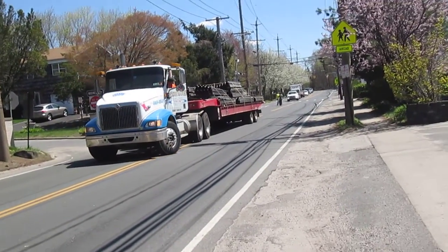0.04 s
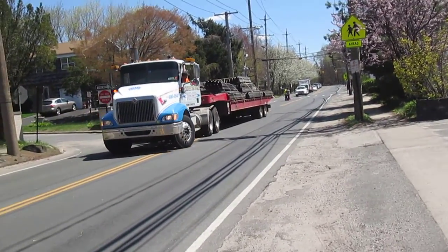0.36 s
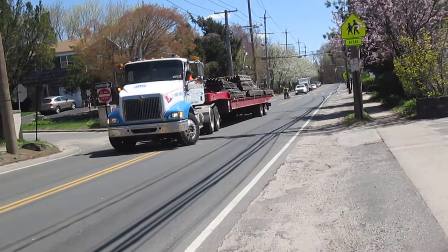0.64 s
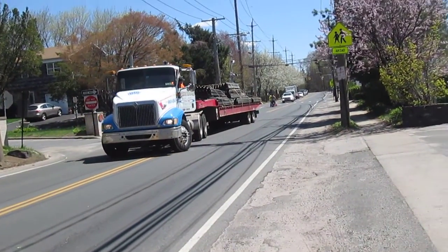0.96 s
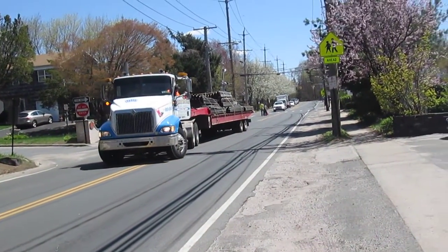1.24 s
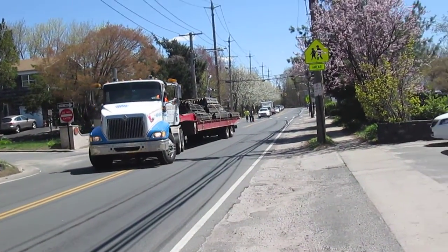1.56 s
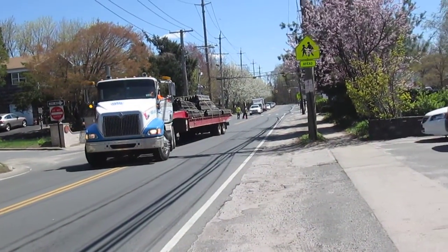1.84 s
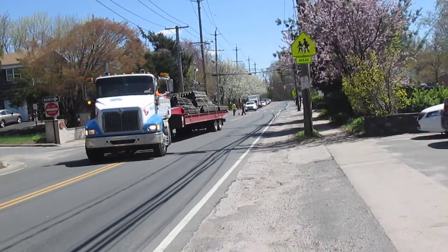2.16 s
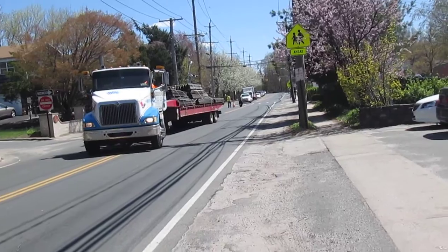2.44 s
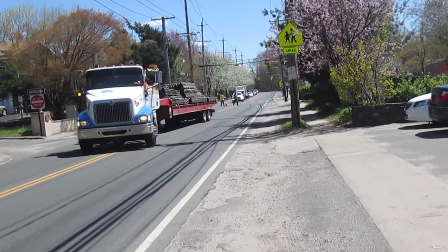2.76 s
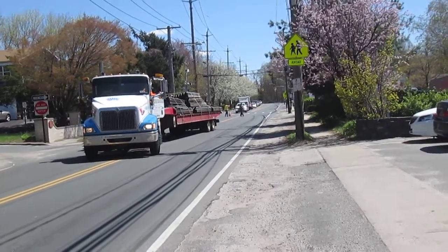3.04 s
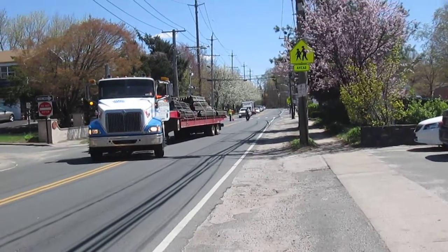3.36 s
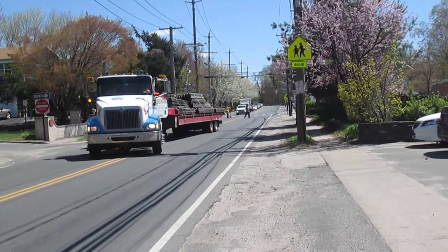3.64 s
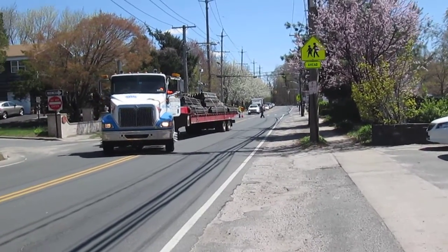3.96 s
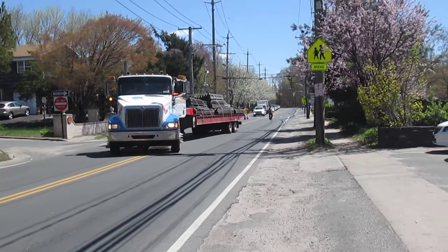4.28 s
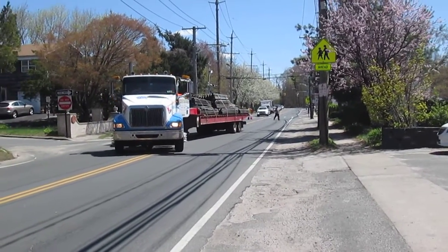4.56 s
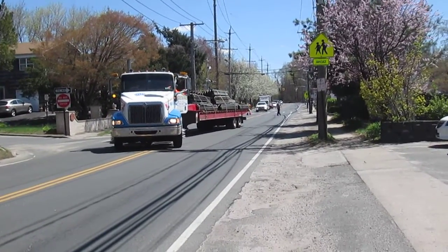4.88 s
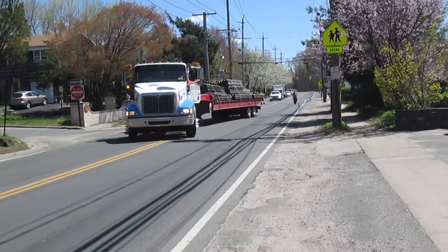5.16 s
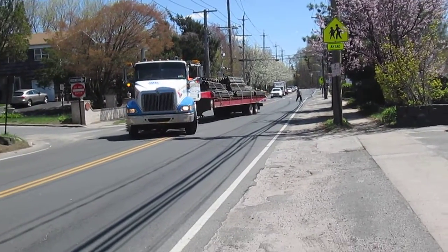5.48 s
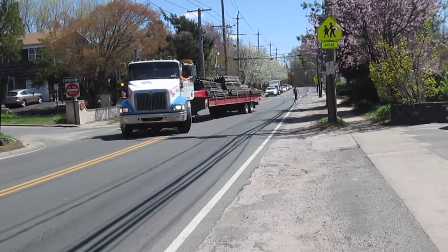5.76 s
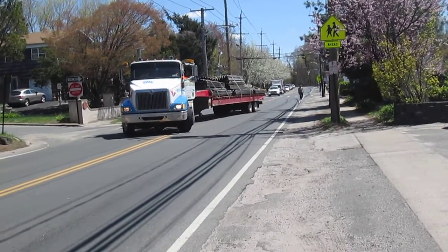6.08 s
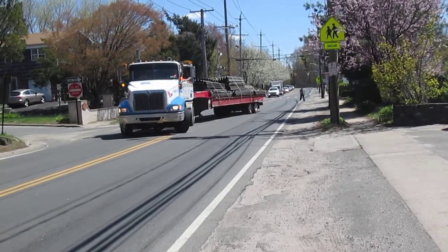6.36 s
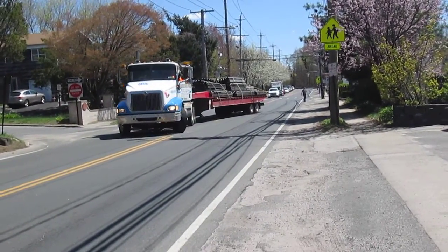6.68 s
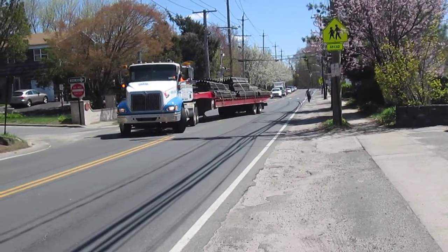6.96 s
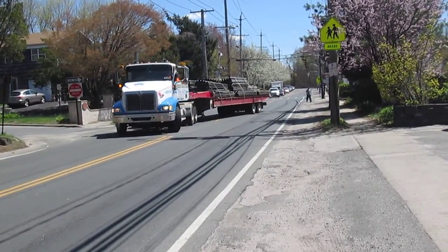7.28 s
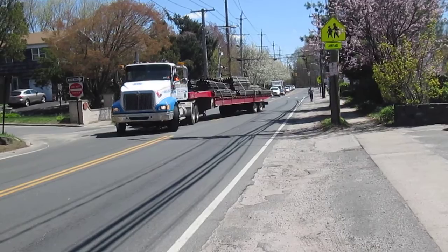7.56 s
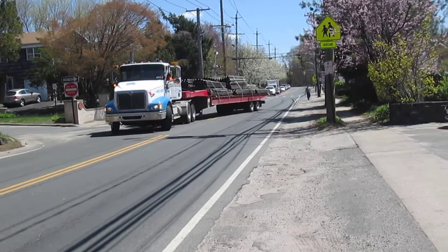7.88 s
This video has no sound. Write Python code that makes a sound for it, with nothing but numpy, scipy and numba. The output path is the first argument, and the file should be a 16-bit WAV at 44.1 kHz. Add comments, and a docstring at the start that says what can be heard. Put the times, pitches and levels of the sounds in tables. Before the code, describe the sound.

A heavy truck's diesel engine rumbles steadily, with one air brake hiss, two dull clunks and gusts of wind on the microphone.

```python
"""A six-cylinder diesel truck creeps backwards with a trailer on a suburban street: its exhaust
drones, its cylinders knock, its gears whine. The air brake lets off one loud hiss, and the truck
rocks to a halt with a rattle and two clunks. Wind buffets the microphone, whose gain control ducks
the whole street and slowly recovers. At the end the engine picks up a little speed."""
import sys
import numpy as np
from scipy import signal
from scipy.fft import rfft, irfft
from scipy.io import wavfile
from scipy.ndimage import uniform_filter1d, minimum_filter1d
from numba import njit

SR = 44100
rng = np.random.default_rng(int(sys.argv[2]) if len(sys.argv) > 2 else 0)


def master_out(mix):
    """Clip the mix to full scale and print it as 16-bit PCM to the path in sys.argv[1]."""
    frames = np.transpose(np.atleast_2d(mix))
    ceiling = np.clip(frames, -1, 1)
    pcm = np.round(ceiling * 32767).astype(np.int16)
    wavfile.write(sys.argv[1], SR, pcm)


N = 353682
TIME = np.arange(N) / SR

# engine speed: (time [s], firing rate [Hz])
ENGINE_SPEED = [(0, 49.15), (.7, 48.95), (1.8, 49.45), (2.2, 49.3), (2.5, 50), (3.1, 50.6), (3.45, 51.05),
                (3.75, 50), (4.2, 48.8), (5.4, 48.85), (6.2, 48.4), (6.45, 47.8), (6.7, 48.8), (7, 51.4),
                (7.25, 53), (7.35, 53.3), (7.6, 54.5), (8.02, 55.4)]
# engine faders: (time [s], thud [dB], drone [dB], chug [dB], knock [dB], whine [dB], fan howl [dB])
ENGINE_MIX = [(0, -28, -15.5, -24, -20.5, -37, -28.5), (.7, -28, -15.5, -22.5, -19.5, -32.5, -32),
              (1.1, -25.5, -18, -23, -20, -32.5, -30), (2.2, -26, -18, -23, -20.5, -30, -27),
              (2.9, -28, -20, -24, -21, -42, -32), (3.45, -30, -18, -23, -22.5, -52, -35),
              (3.85, -28, -19, -23, -23.5, -34, -29.5), (4.3, -41, -21, -24.5, -24.5, -39, -30),
              (5.3, -22.5, -17.5, -21, -24.5, -31.5, -29.5), (6.1, -32, -21.5, -24.5, -23.5, -34, -28),
              (6.5, -35, -17, -22.5, -23, -38, -30), (6.9, -30, -16, -21, -22, -37, -26),
              (7.25, -25, -16.5, -21.5, -22, -44, -32.5), (7.8, -26, -14, -21, -23, -44, -30.5),
              (8.02, -22, -17, -22, -26.5, -32, -34)]
# exhaust partials around the drone: (pitch [x firing rate], relative level [dB])
CHUG_TONES = [(1.5, -17), (2, -8), (2.5, -14.5), (8 / 3, -12.5), (10 / 3, -18.5), (11 / 3, -17),
              (23 / 6, -19.5), (13 / 3, -18.5), (16 / 3, -25.5), (35 / 6, -27)]
# each cylinder's knock, in firing order: (accent [dB])
CYLINDER_ACCENTS = [2, 1, 2.5, 1.5, -3, 3]
# tone of the gas rumble, the air between knocks and the knock: (frequency [Hz], relative level [dB])
RUMBLE_EQ = [(15, -18), (35, 1), (70, -5), (120, -2), (180, 6), (240, -12.5), (400, -25.5)]
WASH_EQ = [(200, -9), (900, -12), (2000, -3), (3500, 0), (15500, 0)]
KNOCK_EQ = [(150, -15.5), (230, -4.5), (340, -1), (540, -3.5), (700, -2.5), (1000, -4.5), (1450, -9),
            (1700, -12), (2500, -21), (3500, -26.5), (4300, -32.5), (5700, -39), (8000, -49), (10500, -56),
            (15500, -73.5)]
# resonances of the engine panels and the loaded block: (frequency [Hz], width [Hz], relative level [dB])
PANEL_MODES = [(699, 32, -6.5), (1131, 15, -3.5), (1744, 200, -6.5), (2270, 45, -7.5), (3600, 150, -14),
               (5580, 600, -3.5)]
BLOCK_MODES = [(449, 30, -1), (512, 92, -6), (575, 81, -4), (672, 110, -2.5), (940, 200, -9),
               (1112, 42, -0.5), (1310, 220, -4)]
# lesser gear and pump tones, then timing gear overtones: (pitch [x firing rate], relative level [dB])
GEAR_TONES = [(10, 4.5), (35 / 3, -4), (13, 0), (41 / 3, -4.5), (15, -3.8), (19, -3)]
TIMING_TONES = [(88 / 3, 0), (44, -3), (176 / 3, -6)]
# gear tones that sing at a resonance: (pitch [x firing rate], resonance [Hz], width [Hz], level [dB])
SINGING_TONES = [(16, 851, 9, -22.5), (20.5, 1115, 16, -34), (18, 992, 12, -35)]
# spread of the fan's howl: (offset from centre [Hz], relative level [dB])
HOWL_SKIRT = [(20, 2), (50, -7.5), (100, -6.5), (200, -23)]
# gusts on the microphone: (centre time [s], half length [s], level [dB])
WIND_GUSTS = [(1.754, 0.056, -29), (3.062, 0.075, -20.5), (3.684, 0.23, -22), (3.998, 0.054, -18),
              (4.216, 0.16, -20.5), (4.583, 0.12, -19), (4.785, 0.098, -23), (5.13, 0.16, -17.5),
              (5.51, 0.069, -14), (5.674, 0.09, -16), (6.685, 0.19, -25.5)]
# tone of the wind: (frequency [Hz], relative level [dB])
WIND_EQ = [(12, -24), (35, 7.5), (90, 1.5), (220, -9), (400, -15.5), (800, -33.5), (2000, -52)]
# eddies hitting the diaphragm: (time [s], level [dB], pitch [Hz], half length [cycles], froth share [dB])
STRONG_EDDIES = [(3.073, -8, 99, 1.2, -18), (3.652, 0, 223, 0.56, -24), (3.761, -5.5, 109, 1, -20),
                 (3.784, -4.5, 110, 0.66, -16), (3.795, 5.5, 190, 0.44, -16), (3.846, -5, 209, 1.3, -21),
                 (4.014, -9, 149, 0.74, -13), (4.034, -2, 250, 0.27, -21), (4.529, -10, 175, 0.92, -9),
                 (4.567, -1.5, 228, .7, -14), (4.576, -5, 264, 0.77, -3), (4.585, 5.5, 250, 0.47, -15.5),
                 (4.77, -5.5, 220, 0.65, -11), (4.836, -3, 225, 0.6, -19), (5.083, -16, 130, 1.2, -8),
                 (5.106, -2, 242, 0.74, -16), (5.139, -3, 170, .8, -10), (5.146, -5, 182, 0.88, -9.5),
                 (5.186, 1.5, 200, .7, -23), (5.192, 9.5, 278, 0.59, -17), (5.212, 3, 260, 0.75, -10),
                 (5.221, -5, 140, 0.82, -3), (5.463, -5, 256, 0.72, -15), (5.487, -6.5, 100, 0.7, -8),
                 (5.508, -5, 119, 1.1, -14), (5.525, -2.5, 220, 0.6, -14), (5.594, -4, 220, 0.45, -19),
                 (5.738, -1, 144, 1.3, -21)]
# air seeping from the brake valve: (start [s], end [s], level [dB])
VALVE_LEAKS = [(.65, 1.104, -65), (2.854, 3.274, -66), (4.992, 5.41, -62), (7.17, 7.683, -66)]
# faint high ticks, then chassis clunks as the truck rocks: (time [s], level [dB])
TICK_HITS = [(.71, -52), (1.888, -47)]
CLUNK_HITS = [(4.156, -12.5), (4.277, -14)]
# tone of the ticks, the brake's air jet and the clunks: (frequency [Hz], relative level [dB])
TICK_EQ = [(2000, -20), (8000, 0), (15000, -3)]
JET_EQ = [(530, -23), (900, 0.5), (1200, -4), (1670, -0.5), (1910, -5.5), (3220, -8), (3990, -9),
          (4330, -10.5), (6580, -12), (12100, -26), (15500, -38)]
CLUNK_EQ = [(100, -9), (300, 4), (750, 4), (1200, -13), (1700, -10), (2500, -26), (6000, -37)]
# resonances of a loose fitting: (frequency [Hz], width [Hz], relative level [dB])
FITTING_MODES = [(1300, 64, 3), (1450, 49, 1), (1684, 110, 1), (1740, 120, -6), (2070, 120, -1),
                 (2340, 80, -11)]
# narrow cuts in the microphone's treble: (frequency [Hz])
MIC_NOTCHES = [3950, 7900]


def undb(db):
    """Decibels to gain."""
    return 10 ** (np.asarray(db) / 20)


def unit(x):
    """Scale to rms 1."""
    return x / np.std(x)


def curves(table):
    """The columns of a time table as automation curves, one value per sample."""
    times, *columns = np.transpose(table)
    return [np.interp(TIME, times, column) for column in columns]


def noise():
    """White noise."""
    return rng.standard_normal(N)


def drift(rate_hz):
    """Smooth random drift with a spread near 1."""
    hold = int(SR / rate_hz)
    steps = noise()[np.arange(N) // hold]
    return 1.3 * uniform_filter1d(uniform_filter1d(steps, hold), hold)


def swell(centre_s, half_s, power=2):
    """A smooth rise to 1 and fall again; a higher power flattens the top."""
    return np.exp(-abs((TIME - centre_s) / half_s) ** power)


def colour(x, eq):
    """Shape x with an EQ curve that rolls off steeply past its last point, at rms 1."""
    hz, db = np.transpose(eq)
    bins = np.maximum(np.fft.rfftfreq(2 * N, 1 / SR), 1)
    gain = undb(np.interp(np.log(bins), np.log(hz), db)) * np.minimum(1, hz[-1] / bins) ** 4
    return unit(irfft(rfft(x, 2 * N) * gain)[:N])


def ring(x, hz, width):
    """One resonance, gain 1 at its centre."""
    return signal.lfilter(*signal.iirpeak(hz, hz / width, fs=SR), x)


def shaken(clatter, modes):
    """A part of the truck set ringing by the knocks, at rms 1."""
    return unit(sum(undb(db) * ring(ring(clatter, hz, width), hz, width) for hz, width, db in modes))


def tones(firings, partials, waver_db, waver_hz, slip_rad):
    """Tones locked to the crankshaft, each wavering in level and phase, together at rms 1."""
    out = np.zeros(N)
    for order, db in partials:
        level = undb(db + waver_db * drift(waver_hz))
        phase = 2 * np.pi * (order * firings + rng.random()) + slip_rad * drift(waver_hz)
        out += level * np.sin(phase)
    return unit(out)


def strikes(hits, eq, decay_s):
    """Noise hits with a fast attack and a short tail."""
    envelope = np.zeros(N)
    for start, db in hits:
        age = np.maximum(TIME - start, 0) / decay_s
        envelope += undb(db) * np.tanh(10 * age) ** 2 * np.exp(-age)
    return envelope * colour(noise(), eq)


def exhaust(firings, thud_db, drone_db, chug_db):
    """Firing pulses thud down the pipe, which drones on their third harmonic amid chug and gas rumble."""
    thud = tones(firings, [(1, 0)], waver_db=-.5, waver_hz=12, slip_rad=.15)
    drone = tones(firings, [(3, 0)], waver_db=-.22, waver_hz=10, slip_rad=.046)
    chug = tones(firings, CHUG_TONES, waver_db=2.3, waver_hz=6, slip_rad=.17)
    rumble = undb(-6) * colour(noise(), RUMBLE_EQ)
    return undb(thud_db) * thud + undb(drone_db) * drone + undb(chug_db) * (chug + rumble)


def cylinder_knock(firings, alike=.928, decay_s=.031, crack_s=.003, jitter_s=.00006, scatter_db=1.16):
    """Each firing cracks and rattles the block; a cylinder's own rattle repeats from cycle to cycle."""
    starts = np.interp(np.arange(.35, firings[-1]), firings, np.arange(N))
    t = TIME[:4096]
    voices = rng.standard_normal((len(CYLINDER_ACCENTS), len(t)))
    envelope = np.exp(-t / decay_s) + .33 * np.exp(-t / crack_s)
    knocks = np.zeros(N + 2 * len(t))
    for k, start in enumerate(starts):
        cylinder = k % len(CYLINDER_ACCENTS)
        at = max(0, int(start + jitter_s * SR * rng.standard_normal()))
        accent = undb(CYLINDER_ACCENTS[cylinder] + scatter_db * rng.standard_normal())
        rattle = np.sqrt(alike) * voices[cylinder] + np.sqrt(1 - alike) * rng.standard_normal(len(t))
        knocks[at:at + len(t)] += accent * envelope * rattle
    wash = undb(3) * colour(noise(), WASH_EQ)  # rushing air fills the gaps
    shake = housing(unit(knocks[:N]) + wash)
    panels = sum(undb(db) * ring(shake, hz, width) for hz, width, db in PANEL_MODES)
    return colour(shake + panels, KNOCK_EQ)


def housing(dry, decay_s=.017, wet_db=-14):
    """The many close modes of the bonnet and frame add a short ringing tail."""
    t = TIME[:4096]
    response = rng.standard_normal(len(t)) * np.exp(-t / decay_s)
    tail = signal.fftconvolve(dry, response / np.linalg.norm(response))[:N]
    return unit(dry + undb(wet_db) * tail)


def block_growl(clatter):
    """The knocks make the loaded block growl while the truck labours backwards."""
    return undb(-33.5) * swell(centre_s=1.46, half_s=1.52, power=4.2) * shaken(clatter, BLOCK_MODES)


def intake_rasp(firing_hz, final_db=-39, db_per_hz=1):
    """Intake air rasps and rings its pipe, louder as the engine speeds up."""
    air = colour(noise(), [(600, -38.5), (2300, 3.5), (3100, -3.5), (4300, -9.5)])
    pipe = undb(17) * (ring(air, 2280, 35) + ring(air, 3180, 45))
    return undb(final_db + db_per_hz * (firing_hz - firing_hz[-1])) * unit(air + pipe)


def gear_whine(firing_hz, firings, whine_db):
    """Meshing gears: a thin whine, lesser tones, and notes that sing out as they cross a resonance."""
    whine = undb(whine_db) * tones(firings, [(16, 0)], waver_db=5, waver_hz=8.8, slip_rad=.046)
    singing = np.zeros(N)
    for order, centre, width, db in SINGING_TONES:
        in_tune = np.exp(-((order * firing_hz - centre) / width) ** 2)
        singing += undb(db) * in_tune * np.sin(2 * np.pi * order * firings)
    lesser = undb(-34.5) * tones(firings, GEAR_TONES, waver_db=-1.5, waver_hz=6.1, slip_rad=.13)
    timing_db = -43.5 - .6 * (firing_hz - firing_hz[0])  # the high ring softens with speed
    timing = undb(timing_db) * tones(firings, TIMING_TONES, waver_db=5.5, waver_hz=15, slip_rad=.25)
    return whine + singing + lesser + timing


def fan_howl(firings, order=15, turbulence_db=-5, size=4096):
    """A narrow howl riding the crankshaft: a pattern that loops every engine cycle, plus turbulence."""
    cylinders = len(CYLINDER_ACCENTS)
    bin_orders = np.arange(size // 2 + 1) / cylinders
    offset_hz = abs(bin_orders - order) * ENGINE_SPEED[0][1]
    gain = undb(np.interp(offset_hz, *np.transpose(HOWL_SKIRT), right=-np.inf))
    pattern = irfft(gain * np.exp(2j * np.pi * rng.random(len(gain))))
    looped = np.interp(firings / cylinders % 1 * size, np.arange(size), pattern)
    phase = 2 * np.pi * order * firings
    turbulence = sum(colour(noise(), HOWL_SKIRT) * wave(phase) for wave in (np.cos, np.sin))
    return unit(unit(looped) + undb(turbulence_db) * unit(turbulence))


def wind_buffet(breeze_db=-39.5, gustiness_db=4, small_per_s=50, steepen=.19):
    """Gusts rumble on the microphone and shed eddies, each a push and pull that tightens as it passes."""
    flow = undb(breeze_db) + sum(undb(db) * swell(centre, half) for centre, half, db in WIND_GUSTS)
    froth = colour(noise(), [(100, -12), (300, -.5), (550, -4.5), (800, -17), (1200, -20.5), (3000, -63)])
    out = flow * undb(gustiness_db * (drift(45) - .5)) * colour(noise(), WIND_EQ)
    eddies = [(at, undb(db), hz, cycles, froth_db) for at, db, hz, cycles, froth_db in STRONG_EDDIES]
    # small random eddies, stronger inside the gusts
    for when, size, pitch in rng.random((int(small_per_s * N / SR), 3)):
        push = flow[int(when * N)] * undb(2) * 2 * size
        hz = 210 * 2 ** (.77 * (2 * pitch - 1))
        eddies.append((when * N / SR, push, hz, 1, -16))
    for at, push, hz, cycles, froth_db in eddies:
        near = slice(*np.searchsorted(TIME, [at - 3 * cycles / hz, at + 3 * cycles / hz]))
        turns = (TIME[near] - at) * hz
        swing = np.sin(2 * np.pi * (turns + steepen * turns ** 2 / cycles))
        out[near] += push * np.exp(-(turns / cycles) ** 2) * (swing + undb(froth_db) * froth[near])
    return out


def valve_leaks():
    """Air seeps from the brake valve in thin, faint wisps."""
    opening = np.zeros(N)
    for start, end, db in VALVE_LEAKS:
        arch = 4 * (TIME - start) * (end - TIME) / (end - start) ** 2
        opening += undb(db) * np.sqrt(np.clip(arch, 0, 1))
    hiss = ring(ring(noise(), 9900, 2200), 9900, 2200)
    sizzle = undb(-14) * ring(noise(), 12700, 1200)
    return opening * unit(hiss + sizzle)


def ticks():
    """Two tiny, bright ticks over the engine."""
    return strikes(TICK_HITS, TICK_EQ, decay_s=.002)


def air_brake(start_s=3.299, attack_s=.022, flutter_db=.6):
    """The valve opens on a jet of air that dulls and dies as the pressure falls."""
    jet = colour(noise(), JET_EQ)
    body = signal.sosfilt(signal.butter(1, 4000, fs=SR, output="sos"), jet)
    valve = 1 - np.exp(-np.maximum(TIME - start_s, 0) / attack_s)
    flutter = undb(flutter_db * drift(80))
    chuff_db = 10 * swell(start_s + .082, half_s=.059)  # the body swells once the valve is fully open
    body_gain = undb(-27.5 + chuff_db) * swell(start_s, half_s=.32, power=3.4)
    treble_gain = undb(-18) * swell(start_s, half_s=.23, power=3.4)
    return valve * flutter * (body_gain * body + treble_gain * (jet - body))


def fitting_rattle(clatter):
    """The knocks shake a loose fitting while the truck rocks after braking."""
    envelope = undb(-37 + 1.8 * drift(21)) * swell(centre_s=4.03, half_s=.36, power=3.6)
    return envelope * shaken(clatter, FITTING_MODES)


def chassis_clunks():
    """The chassis gives two dull clunks as the truck rocks."""
    return strikes(CLUNK_HITS, CLUNK_EQ, decay_s=.0048)


@njit
def peak_hold(x, fall):
    """Follows peaks at once and lets go slowly."""
    out, held = np.empty(len(x)), 0.
    for i in range(len(x)):
        held = max(abs(x[i]), held * fall)
        out[i] = held
    return out


def scene():
    """The truck and the wind, mixed in mono at one microphone."""
    firing_hz, = curves(ENGINE_SPEED)
    thud_db, drone_db, chug_db, knock_db, whine_db, howl_db = curves(ENGINE_MIX)
    firings = np.cumsum(firing_hz) / SR  # running count: the clock for the engine's tones and knocks
    engine = exhaust(firings, thud_db, drone_db, chug_db)
    clatter = cylinder_knock(firings)
    engine += undb(knock_db) * clatter + block_growl(clatter) + intake_rasp(firing_hz)
    engine += fitting_rattle(clatter)
    engine += gear_whine(firing_hz, firings, whine_db) + undb(howl_db) * fan_howl(firings)
    return (engine + air_brake() + valve_leaks() + wind_buffet() + chassis_clunks() + ticks())[None]


def record(dry, threshold_db=-1.33, release_s=.87, fade_s=.004, top_hz=15700):
    """Gain control ducks on overload and recovers slowly; two notches and a high cut trim the treble."""
    over_db = np.maximum(20 * np.log10(abs(dry[0]) + 1e-9) - threshold_db, 0)
    duck_db = peak_hold(over_db, float(np.exp(-1 / (release_s * SR))))
    out = dry * uniform_filter1d(minimum_filter1d(undb(-duck_db), size=128), size=128)
    for hz in MIC_NOTCHES:
        out = signal.lfilter(*signal.iirnotch(hz, hz / 260, fs=SR), out)
    out *= np.minimum(1, np.minimum(TIME, TIME[-1] - TIME) / fade_s)
    return signal.sosfilt(signal.ellip(10, .2, 80, top_hz, fs=SR, output="sos"), out)


dry = scene()
out = record(dry)
master_out(out)
```